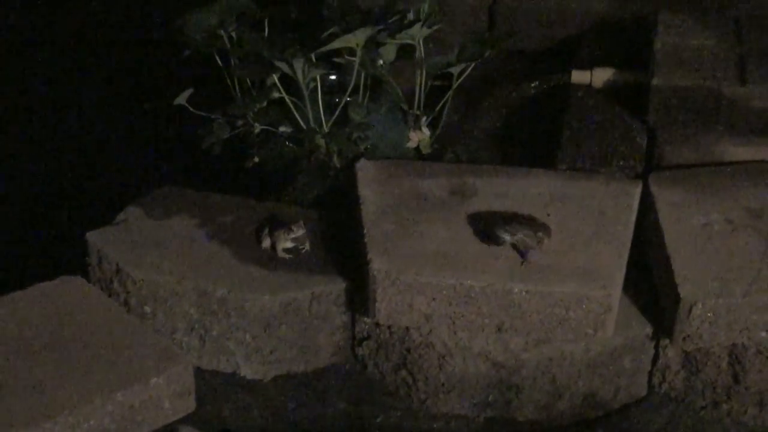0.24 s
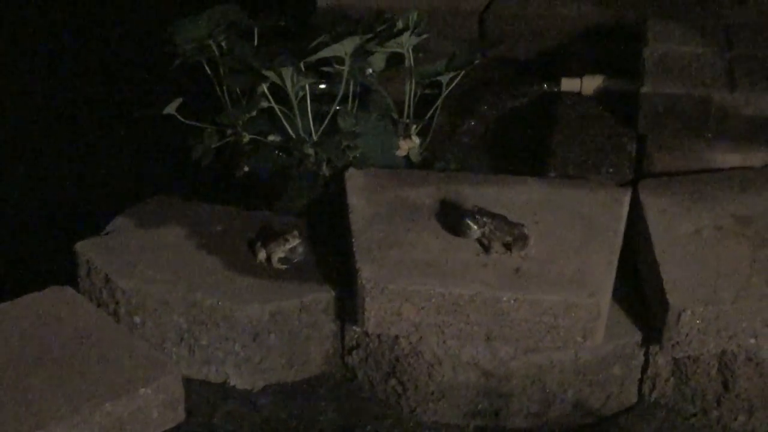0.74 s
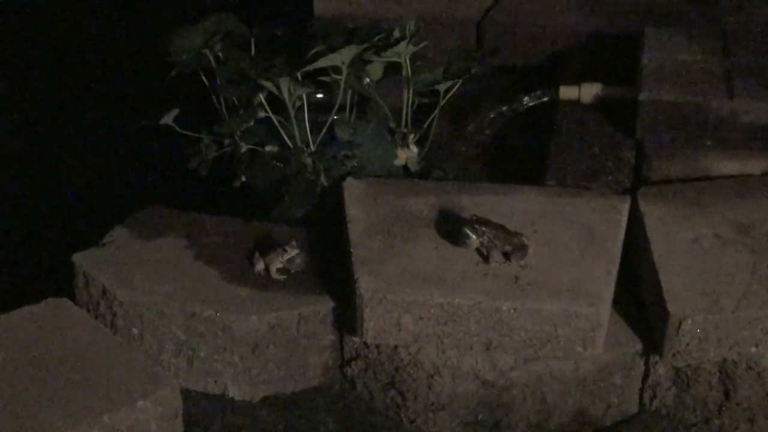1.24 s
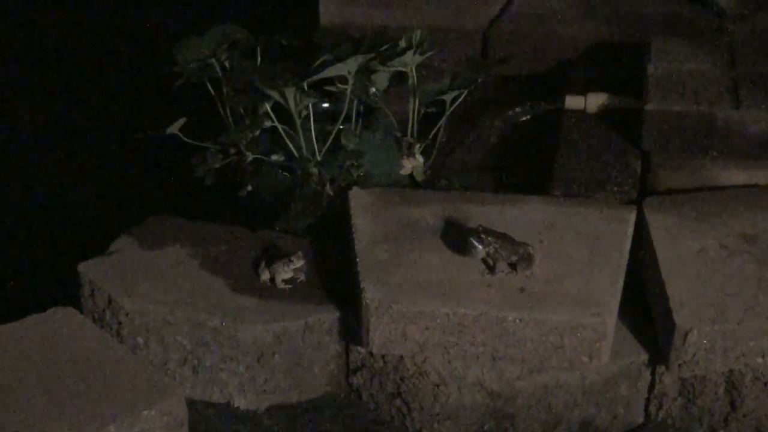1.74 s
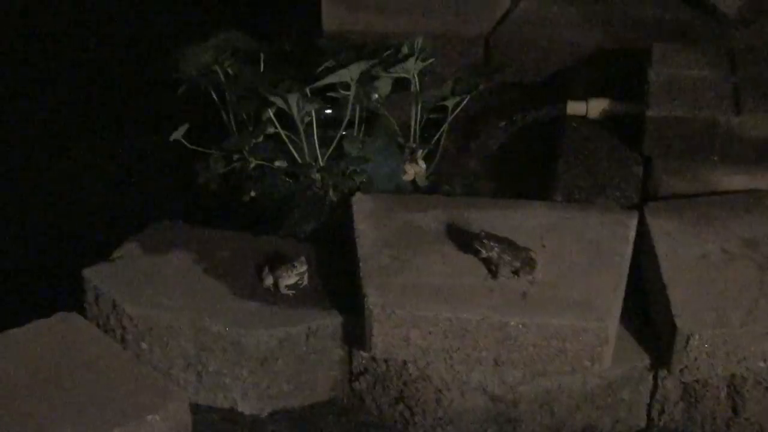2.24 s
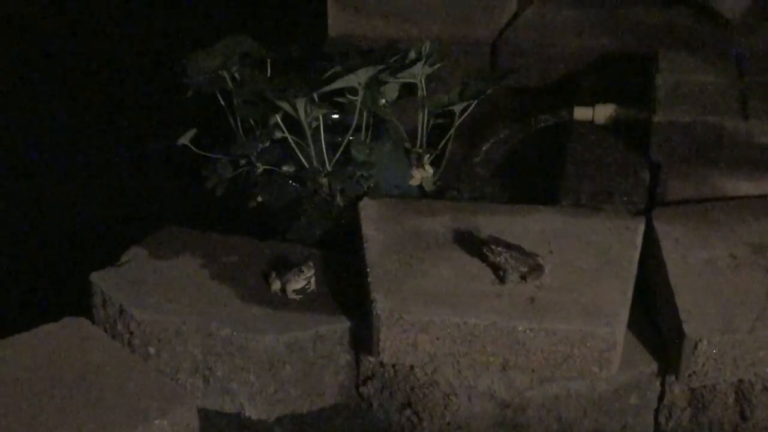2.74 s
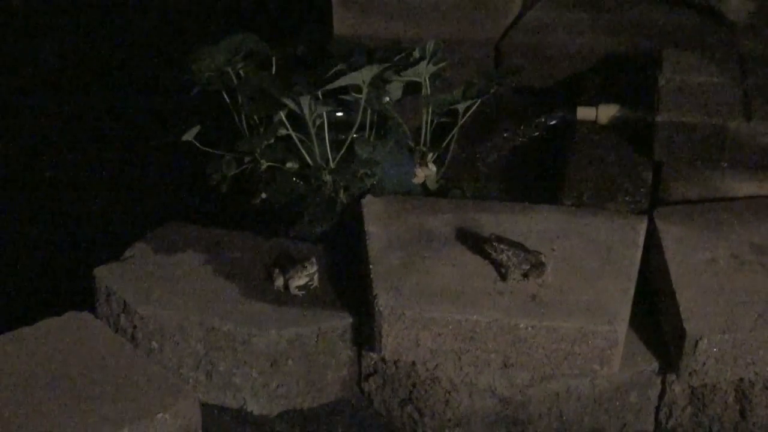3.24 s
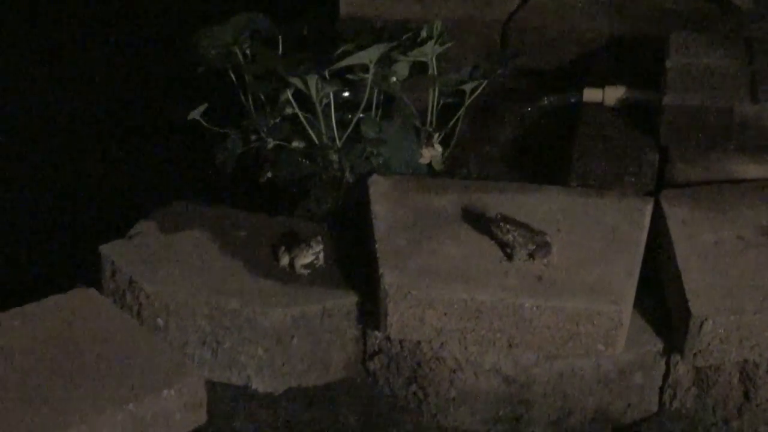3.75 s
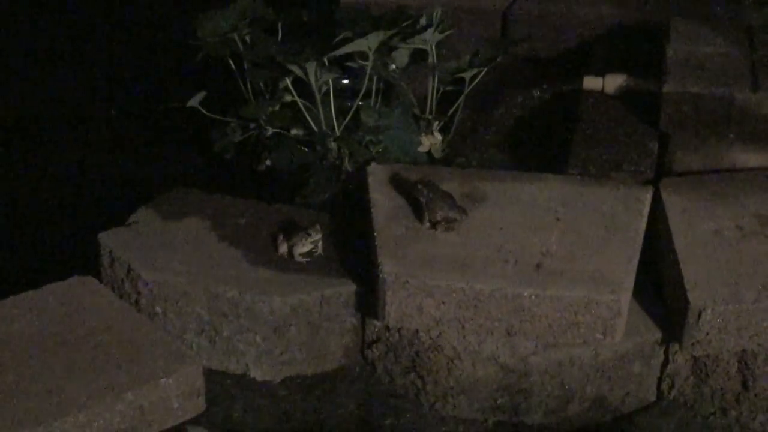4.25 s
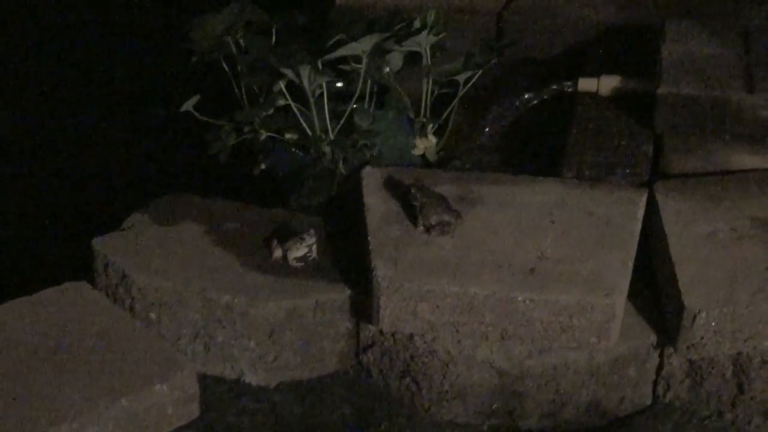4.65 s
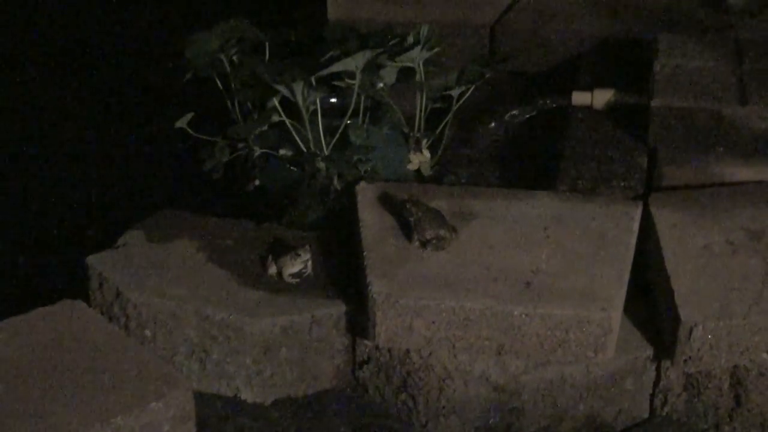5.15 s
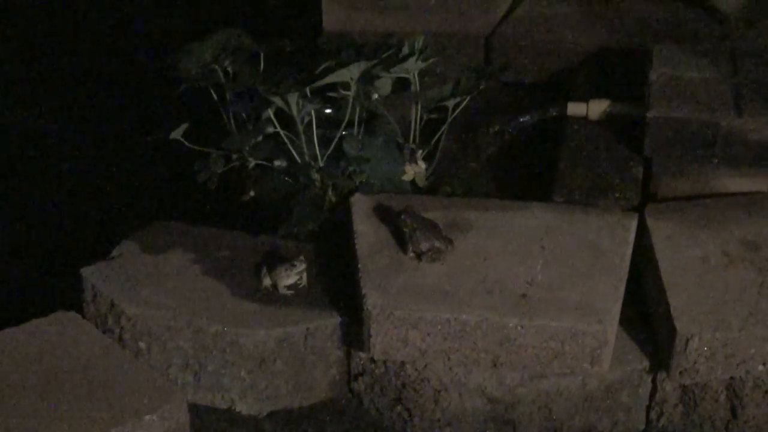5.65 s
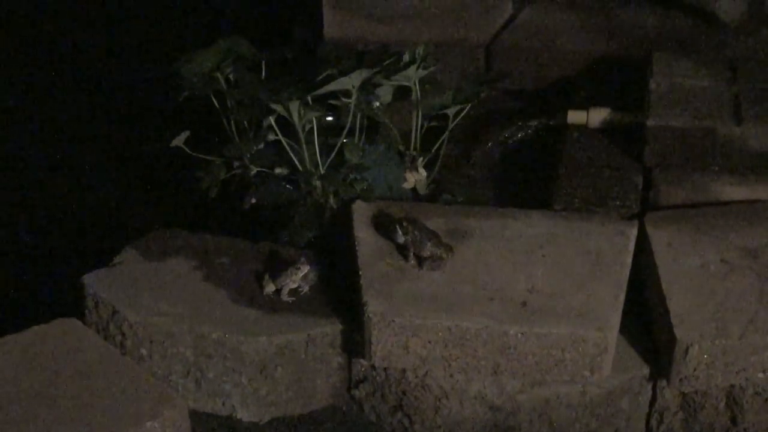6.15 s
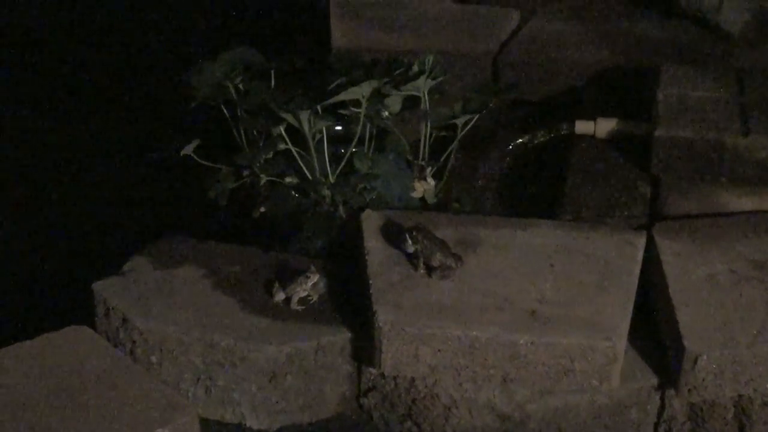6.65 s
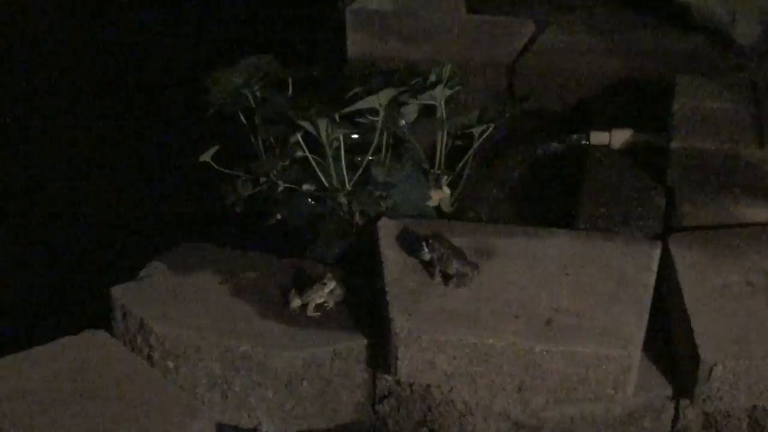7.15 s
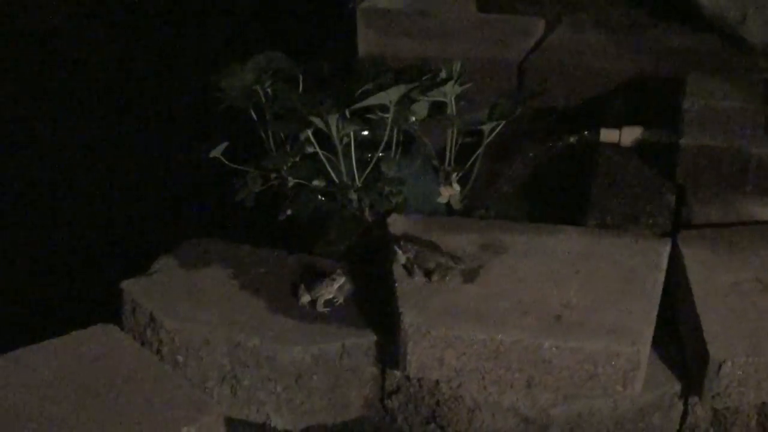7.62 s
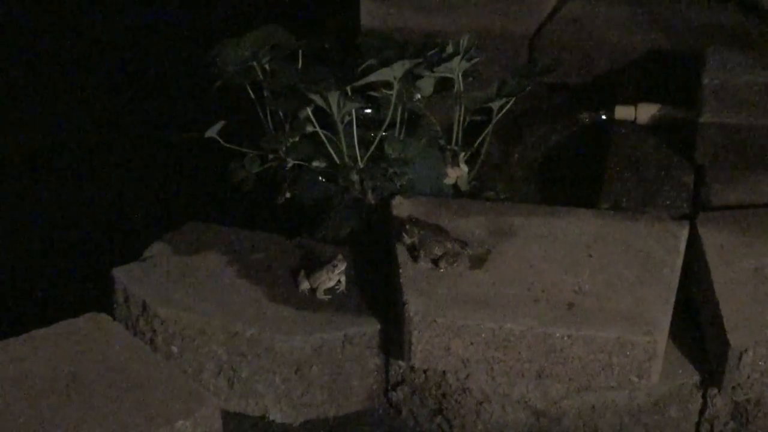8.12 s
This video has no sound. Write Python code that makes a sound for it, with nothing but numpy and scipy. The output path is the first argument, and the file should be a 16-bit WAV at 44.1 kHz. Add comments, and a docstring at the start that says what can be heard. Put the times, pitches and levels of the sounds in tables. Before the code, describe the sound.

At night in a stone-edged garden, two toads burst into overlapping fast, buzzing trills for almost two seconds. After a pause with faint crickets, drips and tiny ticks, another toad trills alone for about a second. Another quiet gap follows, then a brief rising whistle leads the pair into a second long duet. The close calls overload the microphone slightly and bounce off the stone, above soft air and distant hum.

```python
"""Three toads trill at night on the stone blocks of a garden: two together, the third alone, then the two again.
Each trill is a fast train of short tone bursts from the vocal sac, with throat resonances struck by every snap.
Stone and yard reflect the calls, which are loud enough to overload the microphone: they are limited and clipped.
Beneath them two crickets sing as trains of short tones, and drips, ticks and patter ring like dripping water.
Night air and a low distant hum are noise shaped in third-octave bands."""
import sys
import numpy as np
from scipy import signal
from scipy.io import wavfile
from scipy.ndimage import uniform_filter1d, map_coordinates

SR = 44100
rng = np.random.default_rng(int(sys.argv[2]) if len(sys.argv) > 2 else 0)


def pcm_store(signal):
    """Save signal as 16-bit PCM."""
    levels = np.round(np.clip(np.atleast_2d(signal), -1, 1) * 32767)
    wavfile.write(sys.argv[1], SR, levels.astype(np.int16).T)


N = 369558
TIME = np.arange(N) / SR

# the five trills, levels before reflections and limiting: (start [s], end [s], first pulse rate [1/s],
# full pulse rate before tiring [1/s], tiring share [0-1], filling time [s], empty sac pitch [Hz],
# full sac pitch [Hz], tautening time [s], sac sag [Hz/s], level [dB], soft start [dB], surge [dB], last push [dB])
TRILLS = [(.285, 1.725, 117, 150, 0.23, .129, 1554, 2131, 0.12, 20, -10.5, -20, 7.5, -0.5),
          (.358, 2.07, 130, 169, .228, .091, 1512, 1862, .072, -1, -10.5, -10.5, 8, 5.5),
          (3.655, 4.825, 123, 149, .172, 0.13, 1380, 2048, 0.09, 99, -12, -26, 3, -1.5),
          (5.862, 7.7, 119.6, 145.8, .188, .117, 1724, 2178, 0.17, 78.5, -9.5, -18, 7, 1),
          (5.918, 8.1, 133, 170, .18, .074, 1435, 1866, 0.069, 0.5, -14, -11.5, 3, -0.5)]
# throat resonances of the duetting toads and of the lone toad: (frequency [Hz], width [Hz], relative level [dB])
PAIR_THROAT = [(922, 124, -30.5), (1015, 183, -27), (1344, 70, -25), (2510, 325, -22.5), (3510, 550, -20),
               (5710, 340, -26)]
LONE_THROAT = [(793, 106, -27), (1187, 200, -17.5), (2660, 700, -8.5), (4010, 370, -18.5), (5800, 280, -24)]
# reflections of the first duet, the second duet and the lone call: (wall scatter [dB], yard tail [dB])
SURROUNDINGS = [(-18, -26.5), (-13, -22), (-11, -19)]
# the toads as the microphone sways: (time [s], left minus right [dB], level [dB])
SWAY = [(.4, -3, 0), (2, -2.5, 0), (3.82, -3.5, -1), (3.91, -4, 2), (4, -4, 0.5), (4.17, -3, 0),
        (4.24, -3, -3), (4.45, -2.5, 0), (4.8, -3, .5), (5.8, -2.5, 0), (7.7, -2.7, 0), (8.1, -2, 0)]
# spells in which the nearer cricket sings: (start [s], end [s])
CRICKET_SPELLS = [(0, .2), (.4, 2.62), (2.78, 3.39), (3.53, 4.9), (5.03, 8.12), (8.2, 8.38)]
# drips, before reflections and panning: (time [s], peak [dB], pitch [Hz], 60 dB decay time [s])
DRIPS = [(.208, -32, 3140, .027), (.244, -32, 3100, .03), (2.106, -34, 3340, .05),
         (2.538, -30.5, 5247, .025), (2.711, -34, 5820, .02), (2.724, -30.5, 2020, 0.02),
         (2.952, -29.5, 1410, 0.057), (3.16, -36, 1670, .027), (3.218, -30, 714, .029),
         (3.601, -27, 5730, .011), (3.615, -32, 2700, .02), (3.797, -26, 4900, .015),
         (5.438, -37, 3180, 0.021), (5.79, -26, 2410, .017), (5.838, -24, 3230, .016),
         (8.14, -38, 3400, 0.066)]
# sharp ticks, as clicks before their band-pass: (time [s], click height [dB])
TICKS = [(2.121, -11.5), (3.842, -16.5), (4.003, -22), (4.321, -20), (4.697, -15), (4.794, -13),
         (5.011, -16), (8.173, -13.5)]
# colour of the night air: (frequency [Hz], relative density [dB per Hz])
AIR_COLOUR = [(150, 2), (300, -3), (650, 0), (1000, -4.5), (2000, -11.5), (3500, -20), (4400, -8.5),
              (6000, -22), (8000, -21), (11000, -19.5), (15500, -35)]
# colour of the distant hum: (frequency [Hz], relative density [dB per Hz])
HUM_COLOUR = [(20, -18.5), (36, -13), (50, -18.5), (62, -34), (80, -10.5), (100, 0.5), (125, -13.5),
              (170, -14.5), (260, -40.5)]
# stereo likeness of air and hum: (frequency [Hz], left-right correlation [0-1])
LIKENESS = [(100, 1), (300, 0.97), (700, 0.74), (2000, 0.85), (5000, 0.75), (12000, .3)]
# stereo balance of air and hum: (frequency [Hz], left minus right [dB])
BALANCE = [(100, 0), (600, -0.97), (3000, -1), (12000, -1)]
# swells of the background, before a fixed trim: (time [s], hum level [dB], air level [dB])
SWELL = [(0, -47, -44), (.6, -51, -47), (2.5, -50.5, -49.5), (3.6, -46, -44.5), (4.6, -49, -45),
         (5.1, -43, -44.5), (5.9, -46, -44.5), (6.15, -53, -47.5), (8.3, -50, -47.5)]

# a trill speeds up as the sac fills, slows as the toad tires, and slows a little more as it lets go
FILL_CURVE, TIRING_S, LET_GO_S, LET_GO_SLOWING = 1.4, 1.6, .06, .025
# the soft start wears off, then the level surges as the sac comes taut (all in filling times)
SOFT_START_FADE, SURGE_AT, SURGE_WIDTH = 0.64, 1.38, 0.81
LAST_PUSH_S = .1
RASP_UNEVEN_DB = 1.5  # spread from snap to snap
# the high toad's whistle before its second trill breaks in
WHISTLE_START_S, WHISTLE_SPLITS_S, WHISTLE_FADES_S = 5.786, 5.92, 5.955
WHISTLE_HZ, WHISTLE_RISE_HZ_PER_S, WHISTLE_DB, HALF_TONE_DB = 1572, 1450, -16, -9.5
WHISTLE_ATTACK_S, WHISTLE_SPLIT_S, WHISTLE_RELEASE_S = 0.017, .025, .036
CUTOFF_HZ = 15700  # highest treble kept


def toads():
    """The low toad has short crisp pulses; those of the high toad nearly run together; the third calls alone."""
    high_call, low_call, lone_call, high_again, low_again = TRILLS
    low_first = trill(low_call, PAIR_THROAT, swell_s=0.0024, slack_s=.22, slack_stretch=.65,
                      sharpness=3.3, second_db=-26.0, third_db=-36.5, rasp_db=-0.5,
                      slack_db=2.0, slack_rasp_db=-12, flutter_db=0.3)
    low_second = trill(low_again, PAIR_THROAT, swell_s=0.0021, slack_s=.24, slack_stretch=.7,
                       sharpness=3.23, second_db=-25, third_db=-34, rasp_db=3.0,
                       slack_db=3.0, slack_rasp_db=-12, flutter_db=0.43)
    high_first = trill(high_call, PAIR_THROAT, swell_s=0.0029, slack_s=0.15, slack_stretch=.2,
                       sharpness=2.7, second_db=-31.5, third_db=-36.5, rasp_db=-7,
                       slack_db=8.5, slack_rasp_db=11, flutter_db=0.34)
    high_second = trill(high_again, PAIR_THROAT, swell_s=0.0028, slack_s=0.21, slack_stretch=0.42,
                        sharpness=2.9, second_db=-34, third_db=-36, rasp_db=-6,
                        slack_db=2.0, slack_rasp_db=-7.5, flutter_db=1.2)
    lone = trill(lone_call, LONE_THROAT, swell_s=0.0031, slack_s=0.15, slack_stretch=0,
                 sharpness=5.8, second_db=-27, third_db=-27, rasp_db=-4.0,
                 slack_db=7.5, slack_rasp_db=1.5, flutter_db=1.65)
    first_duet = low_first + high_first
    second_duet = low_second + high_second + whistle()
    chorus = among_stones(first_duet, *SURROUNDINGS[0], bounce_db=-30, bounce_s=0.00309)
    chorus += among_stones(second_duet, *SURROUNDINGS[1], bounce_db=-8.5, bounce_s=0.002683)
    chorus += among_stones(lone, *SURROUNDINGS[2], bounce_db=-6.5, bounce_s=0.002685)
    balance_db, sway_db = in_time(SWAY)
    return panned(chorus * from_db(sway_db), balance_db)


def trill(call, throat, swell_s, slack_s, slack_stretch, sharpness, second_db, third_db, rasp_db,
          slack_db, slack_rasp_db, flutter_db):
    """Each snap of the larynx strikes the throat and starts a tone burst in the vocal sac, a few ms long."""
    start, end = call[:2]
    rate, sac_hz, level_db = effort(call)
    sounding = (TIME >= start) & (TIME <= end)
    cycles = np.cumsum(rate[sounding]) / SR
    count = int(cycles[-1])
    jitter = .0065 * rng.standard_normal(count)  # in pulse periods
    shimmer_db = .8 * rng.standard_normal((count, 1))
    snaps = np.interp(np.arange(count) + jitter, cycles, TIME[sounding])[:, None]
    # one row of sample positions per snap, 1/70 s long
    at = np.ceil(snaps * SR).astype(int) + np.arange(SR // 70)
    first = at[:, :1]
    age = np.maximum(at / SR - snaps, 0)

    # while the sac is still filling, the bursts differ in length and rasp, and carry a clearer octave
    slack = np.exp(-((snaps - start) / slack_s) ** 4)
    progress = age / (swell_s * (1 + slack_stretch * slack))
    shape = progress ** sharpness * np.exp(sharpness * (1 - progress))
    turn = 2 * np.pi * sac_hz[first] * age

    # once the sac is taut, the overtones sound only at the crest of each burst;
    # the second wavers a little in pitch, which makes it a broad buzz
    ratio = 2 - (1 - slack) * (.09 + .02 * rng.standard_normal((count, 1)))
    second = from_db(second_db + slack_db * slack) * np.sin(ratio * turn)
    third = from_db(third_db) * (1 - slack) * np.sin(3 * turn)
    bursts = shape * np.sin(turn) + shape ** (4 - 3 * slack) * (second + third)

    # every snap strikes each throat resonance with a strength of its own
    rasp = 0
    for k, (hz, width, db) in enumerate(throat):
        strength = from_db(db + RASP_UNEVEN_DB * rng.standard_normal((count, 1)))
        decay = np.exp(-np.pi * width * age)
        rasp = rasp + (-1) ** k * strength * decay * np.sin(2 * np.pi * hz * age)
    pulses = bursts + from_db(rasp_db + slack_rasp_db * slack) * rasp

    # even out the power of the main tone, so pulse rate and length leave its level alone
    power = rate[first] * np.sum(shape ** 2, axis=1, keepdims=True) / SR / 2
    flutter = flutter_db * drift(35)[first]
    gains = from_db(level_db[first] + shimmer_db + flutter) / np.sqrt(power)
    voice = np.bincount(at.ravel(), (pulses * gains).ravel(), N)[:N]
    # so small a body radiates little bass, and the snap has a dull top
    return band(band(voice, 560, 7000), 480, 7500)


def effort(call):
    """Pulse rate, sac pitch and level of one trill: the sac fills, the toad holds on and tires, then lets go."""
    (start, end, first_rate, full_rate, tiring, fill_s, empty_hz, full_hz, taut_s, sag,
     level_db, soft_db, surge_db, push_db) = call
    age = np.maximum(TIME - start, 0)
    left = np.maximum(end - TIME, 0)
    fill = age / fill_s
    rate = full_rate - (full_rate - first_rate) * np.exp(-fill ** FILL_CURVE)
    rate *= 1 - tiring * (1 - np.exp(-age / TIRING_S))
    rate *= 1 - LET_GO_SLOWING * np.exp(-left / LET_GO_S)
    pitch = full_hz - (full_hz - empty_hz) * np.exp(-age / taut_s) - sag * age
    soft_start = soft_db * np.exp(-fill / SOFT_START_FADE)
    surge = surge_db * np.exp(-((fill - SURGE_AT) / SURGE_WIDTH) ** 2)
    last_push = push_db * np.exp(-left / LAST_PUSH_S)
    return rate, pitch, level_db + soft_start + surge + last_push


def whistle():
    """A pure rising tone; as the effort grows its cycles turn alternately strong and weak, adding half tones."""
    age = np.clip(TIME - WHISTLE_START_S, 0, 1)
    turn = 2 * np.pi * np.cumsum(WHISTLE_HZ + WHISTLE_RISE_HZ_PER_S * age) / SR
    split = (1 + np.tanh((TIME - WHISTLE_SPLITS_S) / WHISTLE_SPLIT_S)) / 2
    attack = 1 - np.exp(-age / WHISTLE_ATTACK_S)
    release = (1 - np.tanh((TIME - WHISTLE_FADES_S) / WHISTLE_RELEASE_S)) / 2
    half_tones = np.sin(3 * turn / 2) + 0.4 * np.sin(turn / 2)
    tone = np.sin(turn) + from_db(-28) * np.sin(2 * turn) + from_db(HALF_TONE_DB) * split * half_tones
    return np.sqrt(2) * from_db(WHISTLE_DB) * attack * release * tone


def among_stones(voice, scatter_db, yard_db, bounce_db, bounce_s):
    """A bounce off the nearest block that shifts as the microphone sways, wall scatter and the yard's tail."""
    # each channel's bounce delay wanders by some 0.05 ms
    bounce = np.array([np.interp(TIME - bounce_s - .00005 * drift(2.2), TIME, voice) for _ in range(2)])
    wall = echoes(voice, t60=0.23, delay=0.0039)
    yard = echoes(voice, t60=0.77, delay=0.06)
    return voice + from_db(bounce_db) * bounce + from_db(scatter_db) * wall + from_db(yard_db) * yard


def crickets():
    """One cricket pauses now and then; a farther one never stops."""
    spells = sum(1. * ((TIME > start) & (TIME < end)) for start, end in CRICKET_SPELLS)
    singing = uniform_filter1d(spells, size=400)  # 9 ms fades
    near = singing * cricket(hz=5220, rate=26, level_db=-54, sag=.03, rough=.009)
    far = cricket(hz=4665, rate=33, level_db=-54.5, sag=.015, rough=.009)
    return near + far + from_db(-3) * echoes(near + far, t60=.1, delay=.004)


def cricket(hz, rate, level_db, sag, rough):
    """Each wing stroke is a short tone that sags in pitch, under a smooth swell."""
    stroke = (rate * TIME + .1 * drift(2.7)) % 1
    pitch = hz * (1 - sag * (stroke - .5) + rough * drift(300))
    song = np.sin(np.pi * stroke) ** 2 * np.sin(2 * np.pi * np.cumsum(pitch) / SR)
    return from_db(level_db) * rms_one(song)


def water():
    """Drips ring briefly as decaying sines; sharp ticks stand out from a fine random patter."""
    drips, clicks = np.zeros(N), np.zeros(N)
    for s, db, hz, t60 in DRIPS:
        drips += ring(from_db(db) * (np.arange(N) == round(s * SR)), hz, t60)
    for s, db in TICKS:
        clicks[round(s * SR)] = from_db(db)
    ticks = band(clicks, 5200, 12000)
    # about 260 tiny clicks a second, dealt at random to 14 resonances
    sizes_db = -38 + 1.9 * np.minimum(rng.exponential(1, N), 3.5)
    sizes = from_db(sizes_db) * rng.choice([-1, 1], N)
    patter = (rng.random(N) < 260 / SR) * sizes
    dealt = rng.integers(0, 14, N)
    pitches = np.geomspace(2600, 13000, 14)
    plinks = sum(ring(patter * (dealt == k), hz, 13 / hz) for k, hz in enumerate(pitches))
    wet = drips + ticks + plinks
    return panned(wet + from_db(-4) * echoes(wet, t60=0.014, delay=0.00033), -3.5)


def background():
    """Soft night air over a distant low hum, both swelling slowly."""
    hum_db, air_db = in_time(SWELL)
    air = coloured_noise(AIR_COLOUR, patchy_db=2.5)
    air /= np.sqrt(np.mean(band(air, 200, 650) ** 2))  # air level is set by its low mids
    hum = rms_one(coloured_noise(HUM_COLOUR, patchy_db=1.0))
    return from_db(air_db - 1.5) * air + from_db(hum_db + 0.84) * hum


def coloured_noise(spectrum, patchy_db):
    """Third-octave bands of stereo noise, each with its own level, flicker and likeness."""
    edges = np.geomspace(20, 16000, 30)
    white = rng.standard_normal((2, 2, N))  # neighbouring bands take different noise
    out = 0
    for k, (low, high) in enumerate(zip(edges, edges[1:])):
        hz = np.sqrt(low * high)
        flicker = drift(13)
        if high < spectrum[0][0] or low > spectrum[-1][0]:
            continue
        mid, side = band(white[k % 2], low, high)
        alike = np.clip(at_hz(LIKENESS, hz), 0, 1)
        pair = np.sqrt(1 + alike) * mid + np.sqrt(1 - alike) * side * [[1], [-1]]
        level = from_db(at_hz(spectrum, hz) + patchy_db * flicker)
        out = out + panned(pair, at_hz(BALANCE, hz)) * level
    return out


def echoes(x, t60, delay):
    """Diffuse reflections: decaying noise tails of unit energy, unrelated in the two channels."""
    age = np.arange(SR) / SR
    tail = rng.standard_normal((2, SR)) * from_db(-60 * age / t60) * (age > delay)
    tail /= np.sqrt(np.sum(tail ** 2, axis=1, keepdims=True))
    return signal.fftconvolve(x[None], tail, axes=1)[:, :N]


def ring(clicks, hz, t60):
    """A two-pole resonator: a unit click sets a decaying sine ringing from height 1."""
    r = from_db(-60 / (t60 * SR))
    w = 2 * np.pi * hz / SR
    return signal.lfilter([0, np.sin(w)], [1, -2 * r * np.cos(w), r * r], clicks + 1e-18)


def drift(rate):
    """Smooth random wandering of spread near 1, through `rate` random knots per second."""
    knots = rng.standard_normal(N // 40)
    return map_coordinates(knots, [TIME * rate], order=2, mode="wrap")


def band(x, low_hz, high_hz):
    """Butterworth band-pass."""
    sos = signal.butter(2, [low_hz, min(high_hz, SR / 2 - 100)], "band", fs=SR, output="sos")
    return signal.sosfilt(sos, x + 1e-18)


def panned(x, balance_db):
    """Left and right with a level difference."""
    return x * from_db(np.array([[.5], [-.5]]) * balance_db)


def in_time(rows):
    """Each column of a curve, interpolated at every sample."""
    s, *columns = np.transpose(rows)
    return [np.interp(TIME, s, c) for c in columns]


def at_hz(points, hz):
    """Read a spectrum on a log-frequency axis."""
    table_hz, values = np.transpose(points)
    return np.interp(np.log(hz), np.log(table_hz), values)


def from_db(db):
    """Decibels to gain."""
    return 10 ** (np.asarray(db) / 20)


def rms_one(x):
    """Scale to rms 1."""
    return x / np.sqrt(np.mean(x ** 2) + 1e-20)


def scene():
    """Toads in front; crickets, water, air and hum behind."""
    return toads() + crickets() + water() + background()


def record(dry):
    """A fast limiter ducks both channels when either overloads; what still passes full scale clips; top is cut."""
    threshold_db, release_db_per_s, attack_s = .6, 500, .0009
    peak_db = 20 * np.log10(np.abs(dry).max(axis=0) + 1e-9)
    over_db = np.maximum(peak_db - threshold_db, 0)
    # jump up with each overload, fall back at a steady rate
    fall_db = release_db_per_s * TIME
    held_db = np.maximum.accumulate(over_db + fall_db) - fall_db
    keep = np.exp(-1 / (attack_s * SR))
    duck_db = signal.lfilter([1 - keep], [1, -keep], held_db)
    clipped = np.clip(dry * from_db(-duck_db), -1, 1)
    return signal.sosfilt(signal.cheby2(16, 70, CUTOFF_HZ + 700, fs=SR, output="sos"), clipped)


dry = scene()
out = record(dry)
pcm_store(out)
```